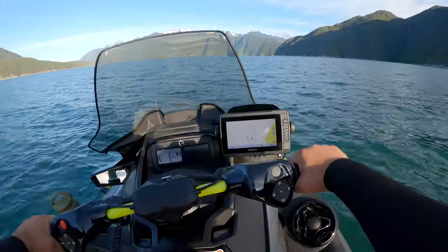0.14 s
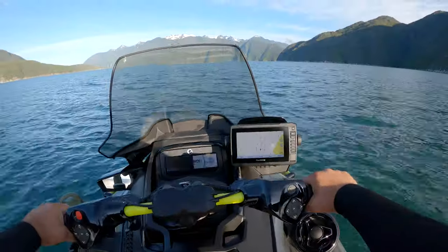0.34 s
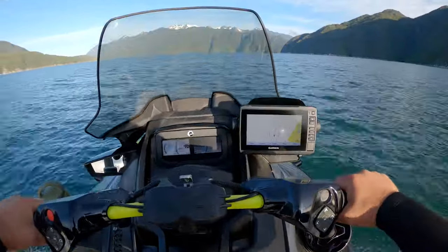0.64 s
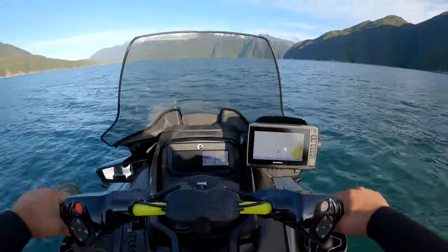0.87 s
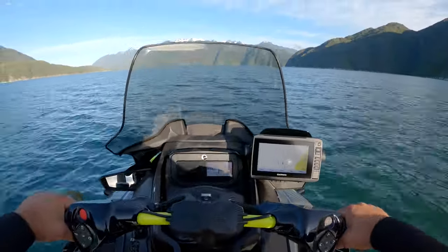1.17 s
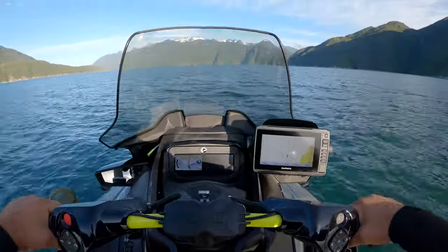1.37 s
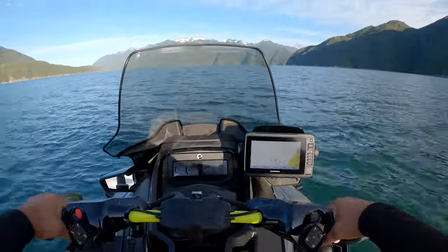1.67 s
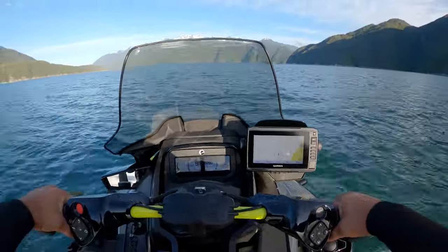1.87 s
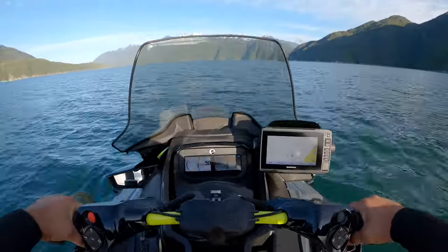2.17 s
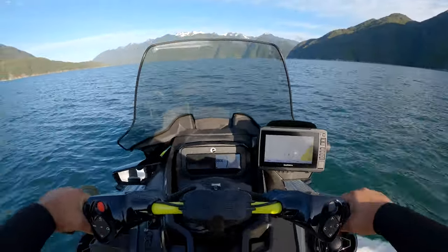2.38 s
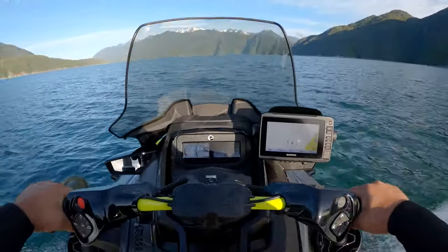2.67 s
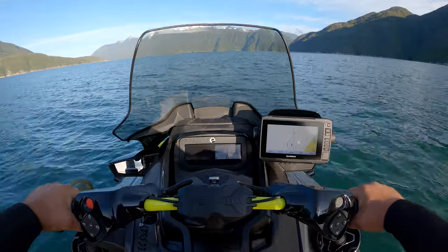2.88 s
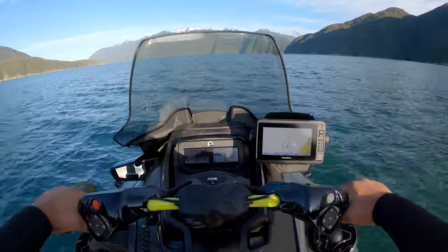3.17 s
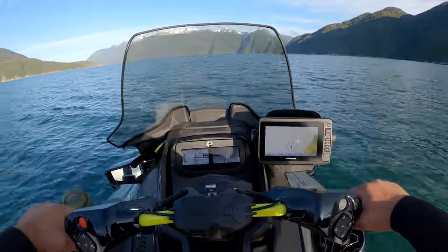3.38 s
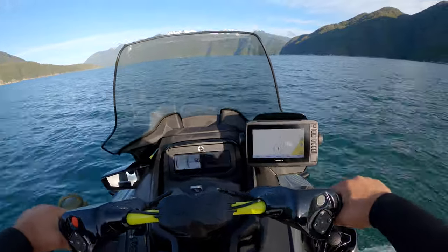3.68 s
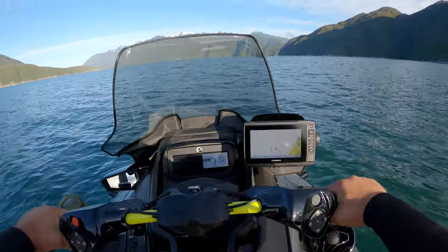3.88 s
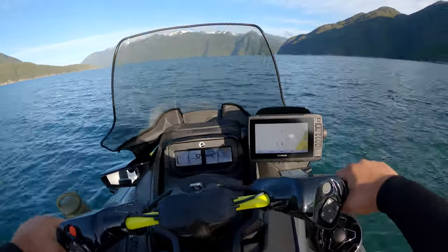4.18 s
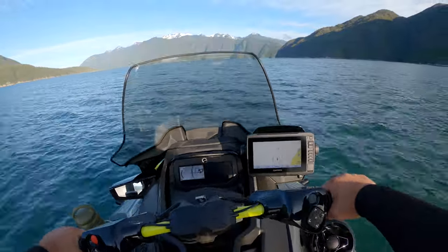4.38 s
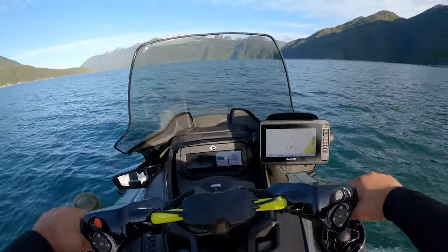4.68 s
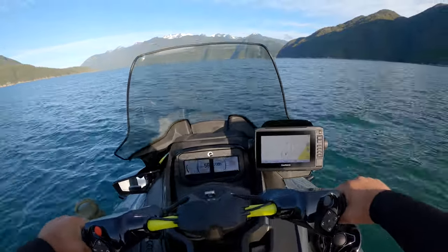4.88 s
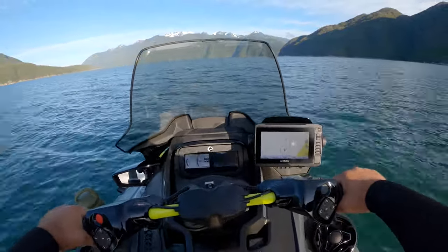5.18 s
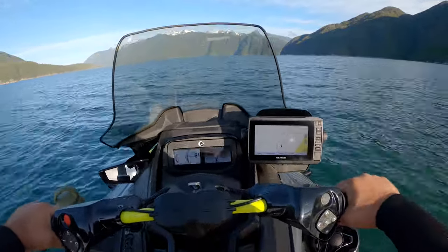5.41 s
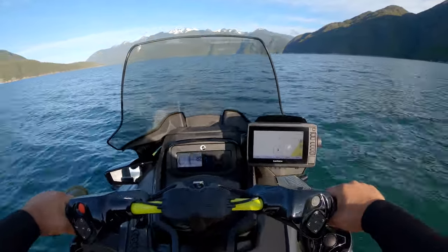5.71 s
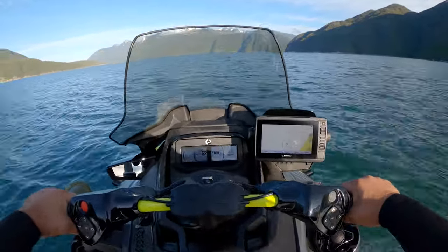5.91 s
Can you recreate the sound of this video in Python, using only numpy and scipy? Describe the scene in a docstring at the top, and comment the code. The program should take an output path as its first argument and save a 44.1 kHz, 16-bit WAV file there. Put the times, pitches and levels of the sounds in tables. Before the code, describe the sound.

A personal watercraft fades in over the first two seconds, cruising across choppy open water. Its engine holds a throbbing drone that creeps slightly higher in pitch. Wind thumps and flutters on the microphone at the rider's chest, with stronger gusts in the second half. Water rushes along the hull throughout, with irregular short wave slaps and brief hisses of spray as the bow dips.

```python
"""A personal watercraft cruises over choppy open water, fading in as heard from the rider's chest.
Its three-cylinder four-stroke drones on multiples of the cycle rate and slowly gathers speed.
Wind flutters off the windscreen and buffets the microphone. Water rushes along the hull,
small waves slap it and each plunge of the bow throws spray. A limiter holds the peaks."""
import sys
import numpy as np
from scipy import signal
from scipy.fft import rfft, irfft
from scipy.io import wavfile
from scipy.ndimage import uniform_filter1d, minimum_filter1d, map_coordinates

SR = 44100
rng = np.random.default_rng(int(sys.argv[2]) if len(sys.argv) > 2 else 0)


def wav_out(sig):
    """Save sig, one row per channel (or a flat mono array), as 16-bit PCM at SR to the path in sys.argv[1]."""
    wavfile.write(sys.argv[1], SR, np.round(np.clip(np.atleast_2d(sig).T, -1, 1) * 32767).astype(np.int16))


N = 266805
T = np.arange(N) / SR

# Engine speed. Each row: time in seconds, four-stroke cycles per second.
CYCLE_RATE = [(0.0, 56.02), (0.4, 55.48), (0.8, 55.7), (1.0, 56.28), (1.5, 56.23), (1.85, 56.75),
              (2.2, 57.24), (2.6, 57.62), (3.0, 57.87), (3.25, 58.13), (3.6, 57.64), (4.2, 58.11),
              (4.6, 58.77), (4.9, 58.9), (5.2, 59.41), (5.6, 59.37), (6.05, 59.8)]
PULLING_HZ, CRUISE_HZ, FAST_HZ = 57.1, 57.9, 59.4  # cycle rates, each with its own engine tone


def undb(db):
    """Decibels to gain."""
    return 10 ** (np.asarray(db) / 20)


def unit(x):
    """Scale to an rms of 1."""
    return x / np.sqrt(np.mean(x ** 2))


def curves(table):
    """Draw each column after the time column as a curve, one value per sample."""
    times, *columns = np.transpose(table)
    return [np.interp(T, times, column) for column in columns]


def above_cruise():
    """How far the engine's cycle rate lies above its cruising rate, in Hz."""
    return curves(CYCLE_RATE)[0] - CRUISE_HZ


def wander(rate_hz):
    """Smooth random movement that changes about rate_hz times a second; rms 1."""
    size = 4096
    f = np.fft.rfftfreq(size, T[-1] / size)
    slow = irfft(rfft(rng.standard_normal(size)) * np.exp(-.5 * (f / rate_hz) ** 2))
    return unit(np.interp(T, np.linspace(0, T[-1], size), slow))


def colour(x, spectrum):
    """Shape x with an EQ curve of (Hz, dB) points; rms 1."""
    hz, db = np.transpose(spectrum)
    f = np.fft.rfftfreq(N, 1 / SR) + 1
    gain = undb(np.interp(np.log(f), np.log(hz), db))
    return unit(irfft(rfft(x) * gain, N))


def band(x, edges_hz):
    """Keep what lies between two frequencies; rms 1."""
    return unit(signal.sosfilt(signal.butter(2, edges_hz, "band", fs=SR, output="sos"), x))


def drops(per_second, spread_db):
    """Random droplet impacts, many small and a few large; rms 1."""
    hit = rng.random(N) < per_second / SR
    size = undb(spread_db * np.minimum(rng.exponential(size=N), 5))
    return unit(hit * size * rng.standard_normal(N))


def burst(spatter, peak_s, length_s, hz, width, sag=.14):
    """A short swell of spatter that falls in pitch: fine drops land first, heavy water after."""
    out = np.zeros(N)
    near = np.abs(T - peak_s) < 2 * max(length_s, .01)
    t = T[near] - peak_s
    read_position = np.cumsum(np.exp(-sag * np.clip(t / length_s, -2, 2)))  # slows as it goes
    stretch = np.roll(spatter, -int(peak_s * SR))[:int(read_position[-1]) + 2]
    grains = band(stretch, [hz / (1 + width), hz * (1 + width)])
    swell = np.exp(-2 * (t / length_s) ** 2)
    out[near] = map_coordinates(grains, [read_position], mode="mirror") * swell
    return out


def calm(level_db=-51, end_s=0.148, release_s=.005):
    """Faint air over still water, which stops as the craft fades in."""
    # A soft, dark hush. Each row: frequency in Hz, relative level in dB.
    air_spectrum = [(25, -4.5), (150, -11), (250, -19.5), (430, -20), (550, -30), (1030, -31.5),
                    (2500, -46), (7000, -50), (9000, -58.5), (14000, -58)]
    gate = np.clip((end_s - T) / release_s, 0, 1)
    return colour(rng.standard_normal(N), air_spectrum) * undb(level_db) * gate


def engine(cylinders=3, singing_order=10, hum_db=2.05, throb_db=2.0, shiver_db=1.5, flutter_db=1.9,
           jitter_turns=.0022, waver_turns=0.032, blur_turns=0.018):
    """Exhaust and hull hum on multiples of the engine cycle; the shaft turns slightly unevenly."""
    # The drone's partials. Each row: multiple of the cycle rate, dB pulling, dB at cruise, dB when fast.
    order_levels = [(1, -42, -46, -39), (2, -35, -34.5, -29), (4, -30, -40, -46), (5, -27, -30.5, -39),
                    (6, -25.5, -27, -29.5), (7, -30.5, -43.5, -39), (8, -32, -41, -39),
                    (9, -37, -41.5, -43.5), (11, -46.5, -59.5, -56.5), (12, -51, -44.5, -41.5),
                    (13, -45.5, -49.5, -44.5), (14, -49, -57.5, -61.5), (15, -57, -45, -50.5),
                    (16, -52.5, -53.5, -55.5), (18, -57.5, -54, -50), (21, -55.5, -57.5, -52)]
    # The hum at the firing rate. Each row: time in seconds, level in dB before hum_db is added.
    firing_hum = [(.15, -35), (.3, -27), (.42, -33), (.68, -33), (.87, -21.5), (1.05, -28.5), (1.25, -37.5),
                  (1.48, -32.5), (1.62, -29.5), (2.0, -23.5), (2.2, -37.5), (2.38, -25.5), (2.62, -32),
                  (2.82, -40), (2.97, -23.5), (3.2, -27), (3.8, -29.5), (4.45, -26.5), (5.0, -32),
                  (5.5, -25.5), (5.75, -30.5), (6.05, -27)]
    # The engine's clear upper note. Each row: time in seconds, level in dB.
    singing_note = [(.2, -38), (.6, -32.5), (1.35, -31), (1.65, -34), (2.0, -29.5), (2.55, -36.5),
                    (2.9, -34.5), (3.2, -34), (3.7, -33), (4.2, -35.5), (4.5, -41), (4.8, -39),
                    (5.15, -53.5), (6.05, -48)]
    clear_orders = (2, 3, 6, 9, 10, 12)
    stages_hz = (PULLING_HZ, CRUISE_HZ, FAST_HZ)
    cycle_hz = curves(CYCLE_RATE)[0]
    cycles = np.cumsum(cycle_hz) / SR + jitter_turns * wander(4.1)
    cruising = np.interp(cycle_hz, (PULLING_HZ, CRUISE_HZ), [0, 1])
    partials = [(cylinders, curves(firing_hum)[0] + hum_db), (singing_order, curves(singing_note)[0])]
    partials += [(round(order), np.interp(cycle_hz, stages_hz, dbs)) for order, *dbs in order_levels]
    drone = np.zeros(N)
    for order, db in partials:
        phase = order * cycles + rng.random()
        if order in clear_orders:
            # clear partials throb, shiver and waver in pitch, the low ones most
            depth = cylinders / max(order, cylinders)
            db = db + depth * (throb_db * wander(7.0) + shiver_db * wander(21))
            phase = phase + depth * waver_turns * wander(7.1)
        else:
            # the rest come and go; from cruise up their pitch blurs, the high ones most
            db = db + flutter_db * wander(3.1)
            phase = phase + blur_turns * order * cruising * wander(5.0)
        drone += undb(db) * np.sin(2 * np.pi * phase)
    _, dip_db = gusts()
    return np.sqrt(2) * drone * undb(-dip_db)


def gusts():
    """Rise of the buffeting and dip of the drone in dB; each gust swells and dies evenly."""
    # Gusts and lulls. Each row: peak time in seconds, rise in dB, length in seconds, dip in dB.
    gust_cues = [(.45, 0, 0.17, 0), (.9, -3.5, 0.14, -0.5), (1.2, -1.5, 0.066, 1.5),
                 (1.426, 3.5, 0.06, 1.5), (1.628, -6.5, 0.072, 0), (1.818, -3.5, 0.16, 3),
                 (2.043, 2.5, .04, 0.5), (2.18, 2, 0.12, 2.5), (2.35, 2.5, .06, -0.5),
                 (2.51, 4.5, 0.045, 2.5), (2.692, 2, 0.12, 3.5), (3.114, 6, 0.087, 5.5),
                 (3.41, 4, 0.065, 2.5), (3.576, -1, 0.045, 0), (3.823, 8.5, 0.064, 1.5),
                 (3.982, 4, 0.044, 1.5), (4.122, -6.5, 0.065, -0.5), (4.317, 5.5, 0.13, -1),
                 (4.6, 8, 0.08, 4), (4.847, 2, 0.074, -1.5), (5.03, 5.5, 0.086, 0), (5.337, 8, 0.059, 7),
                 (5.594, 4.5, 0.065, 0), (5.833, 6, 0.083, 0.5), (6.003, 0, .045, 14)]
    rise_db, dip_db = np.zeros((2, N))
    for peak_s, rise, length_s, dip in gust_cues:
        swell = np.exp(-((T - peak_s) / length_s) ** 2)
        rise_db += rise * swell
        dip_db += dip * swell
    return rise_db, dip_db


def wind(buffet_db=-28.0, eddy_db=4.0, eddy_hz=12, db_per_hz=-0.1):
    """Eddies behind the windscreen thump on the microphone, harder in each gust."""
    # A deep rumble. Each row: frequency in Hz, relative level in dB.
    buffet_spectrum = [(10, -17.5), (22, 2.5), (45, -0.5), (80, -2.5), (120, -6.5), (220, -9.5), (400, -15),
                       (900, -48), (2500, -83.5), (9000, -120)]
    eddies = colour(rng.standard_normal(N), buffet_spectrum)
    # the eddies of one gust are all of similar strength
    eddies /= np.sqrt(uniform_filter1d(uniform_filter1d(eddies ** 2, size=2200), size=1100))
    gust_db, _ = gusts()
    return eddies * undb(buffet_db + db_per_hz * above_cruise() + gust_db + eddy_db * wander(eddy_hz))


def plunges(fall_ratio=1.49):
    """Rise of spray and wash in dB as the bow drops; water rains back slower than it is thrown."""
    # The bow hits a swell. Each row: peak time in seconds, spray in dB, wash in dB, length in seconds.
    plunge_cues = [(0.387, 4, 6, 0.04), (0.623, 9, 10, 0.15), (1.179, 3, 4, 0.062), (1.398, 6.5, 3.5, 0.12),
                   (1.42, 2, 3, 0.019), (2.019, 7, 4, 0.12), (2.51, 7, 8, 0.021), (2.686, 7, 3, 0.064),
                   (2.86, 4, 2.5, 0.1), (3.337, 4.5, 4, 0.23), (3.332, 5.5, 2, 0.023),
                   (3.852, 2, 2.5, 0.094), (4.172, 4.5, 2.5, 0.23), (4.748, 6.5, 2.5, 0.11),
                   (5.43, 7, 2, 0.12), (5.951, 4, 3.5, 0.025)]
    # Both ebb as the bow rides high. Each row: time in seconds, dip in dB, length in seconds.
    ebb_cues = [(.97, 1.5, .1), (1.682, 1.7, .1), (2.333, 0.5, .1), (2.57, 0.5, .03), (3.09, 0.5, .07),
                (4.42, 0.7, .08), (5.05, -1.5, .1), (5.6, 1.5, .05)]
    spray_db, wash_db = np.zeros((2, N))
    for peak_s, spray, wash, length_s in plunge_cues:
        from_peak_s = np.maximum(peak_s - T, (T - peak_s) / fall_ratio)
        swell = np.exp(-(from_peak_s / length_s) ** 2)
        spray_db += spray * swell
        wash_db += wash * swell
    ebb_db = sum(dip * np.exp(-((T - at_s) / length_s) ** 2) for at_s, dip, length_s in ebb_cues)
    return spray_db - ebb_db, wash_db - ebb_db


def water(rush_db=-26.0, wash_db=-51, spray_db=-72.0, rush_db_per_hz=0.12, wash_db_per_hz=1.1,
          gust_share=0.43, churn_db=1.57, splatter_db=0.85, fizz_db=0.5):
    """Air and water rush past the hull; each plunge throws bow wash and fine spray that fall as drops."""
    # Low rush, bright wash and fizzing spray. Each row: frequency in Hz, relative level in dB.
    rush_spectrum = [(60, -20), (140, 1.5), (200, 2), (260, 2), (390, -1), (500, -5.5), (560, -6),
                     (630, -8), (760, -10), (900, -13.5), (1100, -22), (1300, -21.5), (1800, -32.5),
                     (12000, -100)]
    wash_spectrum = [(500, -11), (1200, -2.5), (1600, -3), (2000, -3.5), (2600, 1.5), (3200, -6.5),
                     (4300, -8), (5200, -15.5), (6500, -28.5), (14000, -76.5)]
    spray_spectrum = [(2000, -9), (4500, 0.5), (6000, 6), (7000, 3), (8400, 3), (10000, -6), (11500, -15.5),
                      (13000, -34.5), (15000, -45.5)]
    spray_rise_db, wash_rise_db = plunges()
    gust_db, _ = gusts()
    churn = wander(20)  # moves all three layers together
    rush = colour(rng.standard_normal(N), rush_spectrum)
    rush *= undb(rush_db + rush_db_per_hz * above_cruise() + gust_share * gust_db + churn_db * churn)
    wash = colour(drops(per_second=7000, spread_db=0.46), wash_spectrum)
    wash *= undb(wash_db + wash_db_per_hz * above_cruise() + wash_rise_db + splatter_db * churn)
    spray = colour(drops(per_second=16000, spread_db=1.5), spray_spectrum)
    spray *= undb(spray_db + spray_rise_db + fizz_db * churn)
    return rush + wash + spray


def ripples(level_db=-53, per_second=60, spread_db=3, db_per_hz=1.0, decay_s=0.018):
    """Small ripples tick against the hull at random, harder with speed; each is a tiny dying splash."""
    # A midrange tick. Each row: frequency in Hz, relative level in dB.
    tick_spectrum = [(400, -13), (900, 9), (1400, 6), (2000, -16), (2700, -5), (4300, -16), (6000, -29),
                     (12000, -62.5)]
    hits = rng.random(N) < per_second / SR
    sizes = undb(spread_db * np.clip(rng.standard_normal(N), -2, 2))
    envelope = signal.lfilter([1], [1, -np.exp(-1 / (decay_s * SR))], hits * sizes)
    ticks = colour(envelope * rng.standard_normal(N), tick_spectrum)
    return ticks * undb(level_db + db_per_hz * above_cruise())


def slaps(spatter_db=-5.0, crack_db=-3, crack_s=0.0005, knock_db=-2.5, knock_s=0.012):
    """The flat of a wave meets the hull: a sudden crack and a short spatter over a duller knock."""
    # Each row: peak time in seconds, relative dB of spatter and crack, relative dB of the knock,
    # length in seconds, centre of the spatter in Hz.
    slap_cues = [(0.212, -43, -30, .004, 2400), (0.281, -42, -38, .005, 2900),
                 (0.955, -44, -40, .004, 2600), (1.161, -48, -32, .016, 2300),
                 (1.193, -47, -36, 0.012, 1400), (1.401, -42, -33.5, 0.0057, 2600),
                 (1.43, -53, -31, .02, 1700), (1.799, -46, -31, .007, 1600), (2.025, -47, -28, 0.01, 1500),
                 (2.063, -50, -32.5, 0.041, 1800), (2.141, -39.5, -35, .005, 2880),
                 (2.174, -41, -33, 0.0073, 1700), (2.413, -40, -31, 0.0098, 1600),
                 (2.532, -30.5, -28, 0.008, 2271), (2.623, -39, -33, 0.021, 1900),
                 (2.694, -36.5, -32, 0.0075, 1717), (2.719, -43, -35, 0.011, 1900),
                 (3.078, -36, -32, 0.007, 2400), (3.37, -37, -29.5, 0.015, 1698),
                 (3.49, -44, -36, .005, 3000), (3.683, -40.5, -36, 0.0072, 2300),
                 (3.826, -44, -32, 0.03, 1503), (3.847, -34.5, -35, 0.0045, 2560),
                 (3.952, -42, -35, .004, 2504), (4.01, -43, -38, 0.0081, 1885),
                 (4.068, -46, -36, 0.0038, 2700), (4.563, -39, -39, 0.0039, 2613),
                 (4.599, -37, -31, .007, 1696), (4.627, -40, -42, 0.00298, 2477),
                 (4.938, -40, -26, 0.012, 1700), (4.967, -41, -37, .008, 1907),
                 (5.052, -32, -26.5, 0.007, 2900), (5.167, -43, -35, 0.0054, 2200),
                 (5.197, -43, -34, 0.021, 1500), (5.344, -38, -30.5, 0.01, 2478),
                 (5.783, -41, -27.5, .012, 2600), (5.807, -41, -29, .0071, 1500),
                 (5.858, -38, -36, 0.0034, 3400), (5.873, -38.5, -34, 0.032, 1600),
                 (5.898, -33.5, -38, 0.0022, 2700), (5.966, -33.5, -29, 0.00484, 2720),
                 (5.975, -43, -28.5, 0.0074, 1702)]
    out = np.zeros(N)
    spatter = drops(per_second=9000, spread_db=0.94)
    crack = band(rng.standard_normal(N), edges_hz=(1100, 4050))
    knock = band(rng.standard_normal(N), edges_hz=(574, 1134))
    for peak_s, bright_db, dull_db, length_s, hz in slap_cues:
        out += burst(spatter, peak_s, length_s, hz, width=0.26) * undb(bright_db + spatter_db)
        body_s = max(length_s, knock_s)
        near = np.abs(T - peak_s) < 2 * body_s
        t = T[near] - peak_s
        out[near] += crack[near] * undb(bright_db + crack_db) * np.exp(-(t / crack_s) ** 2)
        out[near] += unit(knock[near]) * undb(dull_db + knock_db) * np.exp(-2 * (t / body_s) ** 2)
    return out


def round_hull(x, top_hz=4600):
    """Sound loses its top on the way round the hull."""
    return signal.sosfilt(signal.butter(6, top_hz, fs=SR, output="sos"), x)


def mist(level_db=-93, growth=1.8):
    """The hardest plunges tear the spray into a mist that grows faster than the spray itself."""
    # An airy hiss. Each row: frequency in Hz, relative level in dB.
    mist_spectrum = [(5000, -24.5), (8000, -2.5), (10000, 0), (11500, -6), (13000, -22), (15000, -45)]
    spray_rise_db, _ = plunges()
    return colour(rng.standard_normal(N), mist_spectrum) * undb(level_db + growth * spray_rise_db)


def splashes(trim_db=-4.0):
    """Thrown water lands: a bright spatter of drops that swells and dies."""
    # Each row: peak time in seconds, relative level in dB, length in seconds, centre in Hz.
    splash_cues = [(0.542, -43, .012, 3000), (0.7, -48, 0.058, 2900), (1.161, -43.5, 0.033, 3220),
                   (2.065, -39.5, 0.017, 3200), (2.357, -42, 0.053, 3020), (2.509, -38.5, .015, 3488),
                   (2.792, -43, 0.013, 2900), (3.068, -40.5, 0.0054, 3580), (3.186, -46, 0.028, 2704),
                   (3.35, -42, 0.016, 3160), (3.664, -43.5, 0.039, 2910), (3.786, -45, 0.0072, 3107),
                   (4.022, -45, 0.026, 3460), (4.282, -44, 0.047, 2920), (4.453, -45, 0.0067, 3600),
                   (4.698, -42, 0.034, 3610), (5.109, -44, 0.055, 3480), (5.8, -46, 0.023, 3000),
                   (5.937, -39.5, .007, 3470), (6.018, -45, 0.013, 3703)]
    spatter = drops(per_second=5000, spread_db=0.94)
    return sum(burst(spatter, peak_s, length_s, hz, width=0.22) * undb(db + trim_db)
               for peak_s, db, length_s, hz in splash_cues)


def vortices(level_db=-35, width_hz=13, gust_share=0.18, start_s=.9, attack_s=0.3):
    """Vortices peel off the windscreen: a hollow flutter whose pitch wanders with the airflow."""
    # The flutter's pitch. Each row: time in seconds, frequency in Hz.
    shedding_pitch = [(1.0, 125), (1.15, 102.6), (1.27, 127.5), (1.45, 108.4), (1.9, 115.3), (2.08, 147.9),
                      (2.3, 104.8), (2.48, 107.9), (2.62, 136.2), (2.85, 102), (3.15, 120.9), (3.4, 104.9),
                      (3.8, 145), (4.1, 112.3), (4.6, 110), (5.8, 136.1)]
    phase = 2 * np.pi * np.cumsum(curves(shedding_pitch)[0]) / SR
    flutter = wander(width_hz) * np.cos(phase) + wander(width_hz) * np.sin(phase)
    onset = np.clip((T - start_s) / attack_s, 0, 1)
    gust_db, _ = gusts()
    return onset * flutter * undb(level_db + gust_share * gust_db)


def scene(fade_start_s=0.086, fade_s=1.72, engine_fade_power=1.057):
    """Engine, wind and water at one microphone, fading in out of the calm."""
    fade = np.clip((T - fade_start_s) / fade_s, 0, 1)
    still_air = calm()
    drone = fade ** engine_fade_power * engine()  # comes up a little behind the rest
    wind_and_water = wind() + vortices() + water() + round_hull(slaps() + splashes()) + ripples() + mist()
    return (still_air + drone + fade * wind_and_water)[None]


def limiter(x, threshold_db=-12.5, ratio=3.5, hold_s=0.0044):
    """Turns the gain down smoothly around each peak above the threshold."""
    span = int(hold_s * SR)
    gain = np.minimum(1, undb(threshold_db) / (np.abs(x) + 1e-9)) ** (1 - 1 / ratio)
    held = minimum_filter1d(gain, span)
    return x * uniform_filter1d(uniform_filter1d(held, span // 2), span // 2)


def record(dry, top_hz=14300, fade_out_s=.004):
    """Limits the peaks, closes with a very short fade and cuts the highest treble."""
    fade_out = np.clip((T[-1] - T) / fade_out_s, 0, 1)
    lowpass = signal.ellip(8, .2, 70, top_hz, fs=SR, output="sos")
    return signal.sosfilt(lowpass, limiter(dry) * fade_out)


dry = scene()
out = record(dry)
wav_out(out)
```